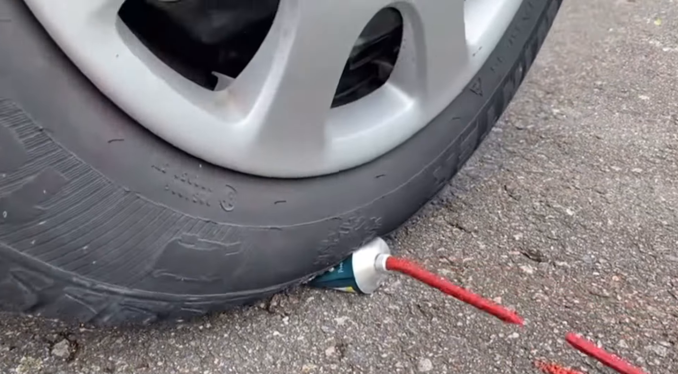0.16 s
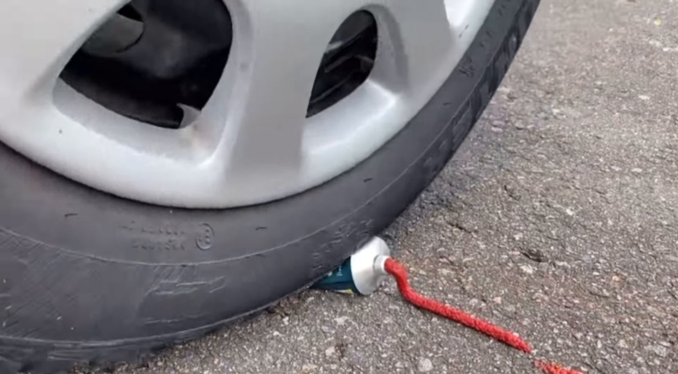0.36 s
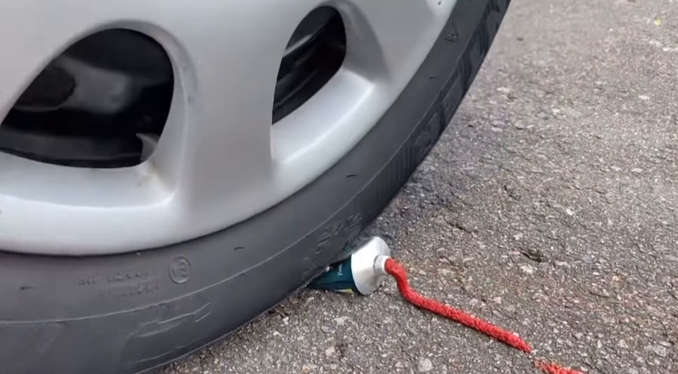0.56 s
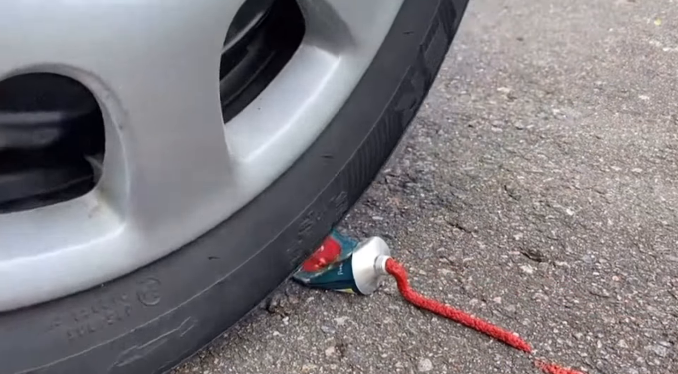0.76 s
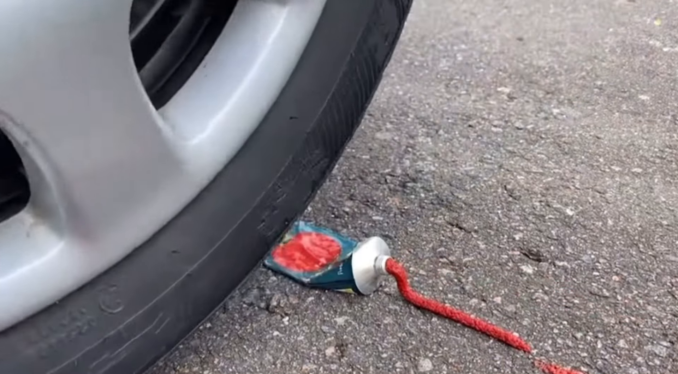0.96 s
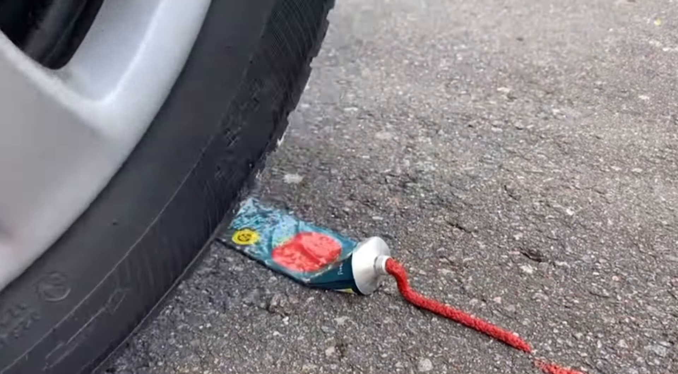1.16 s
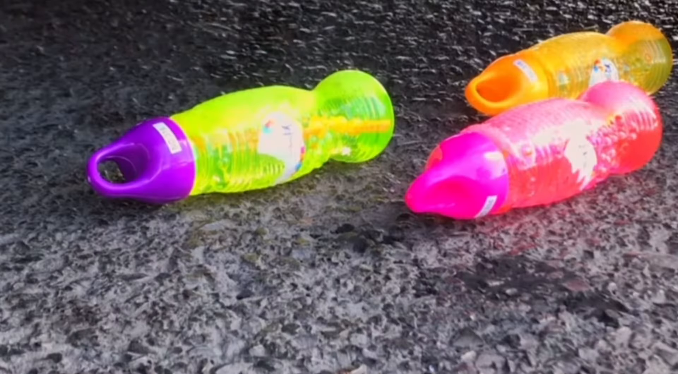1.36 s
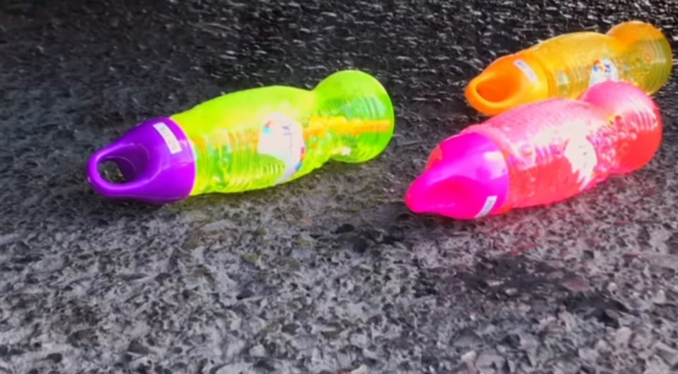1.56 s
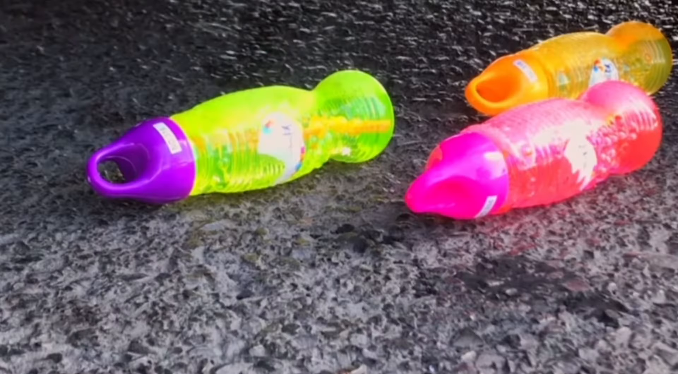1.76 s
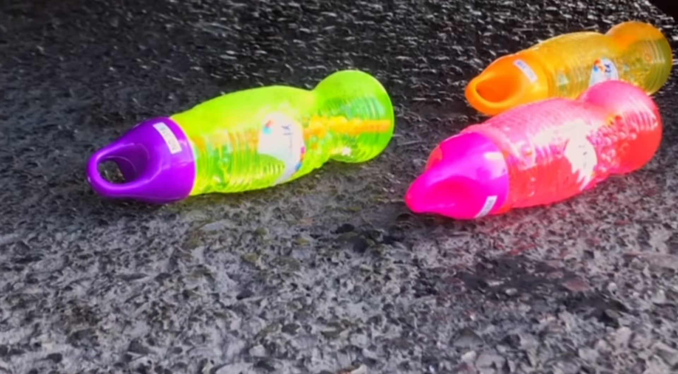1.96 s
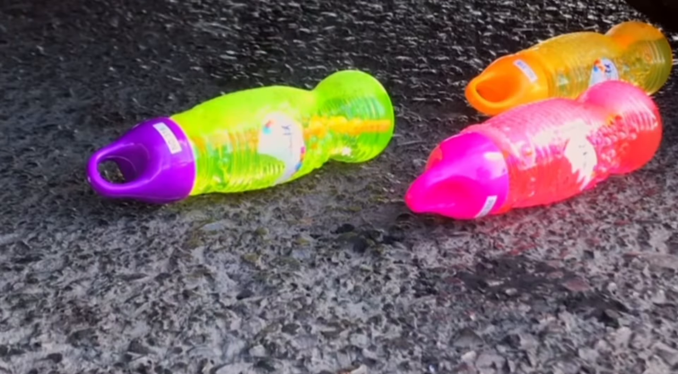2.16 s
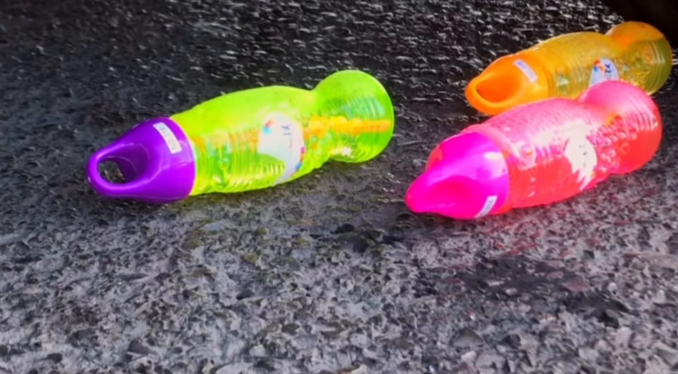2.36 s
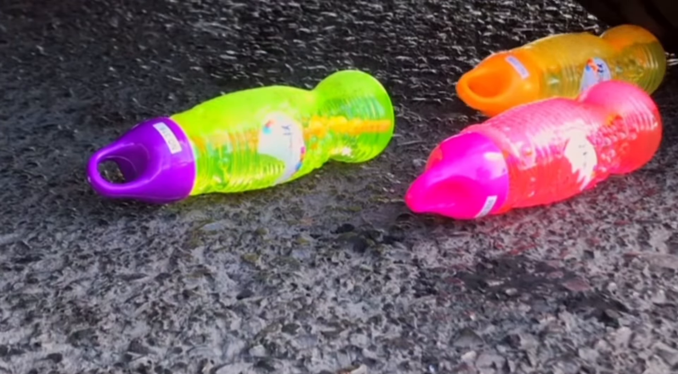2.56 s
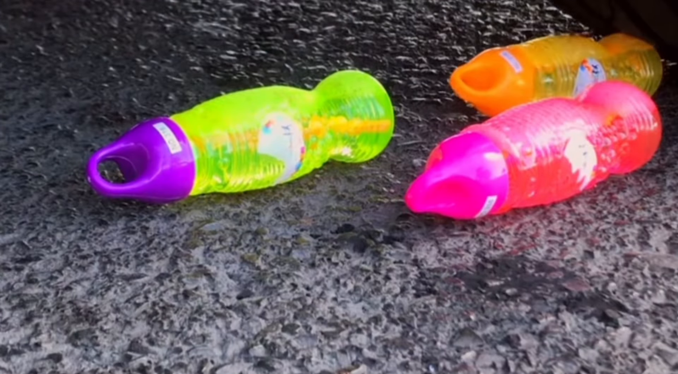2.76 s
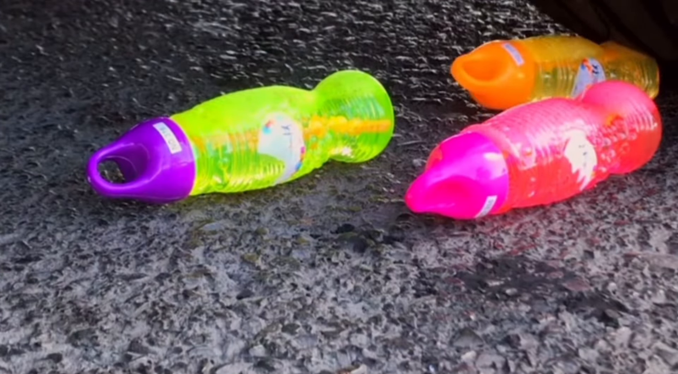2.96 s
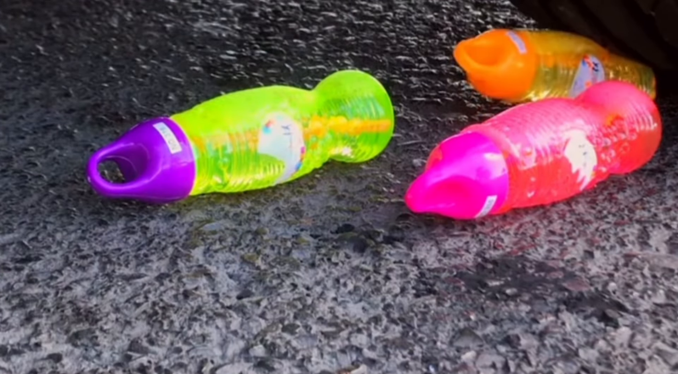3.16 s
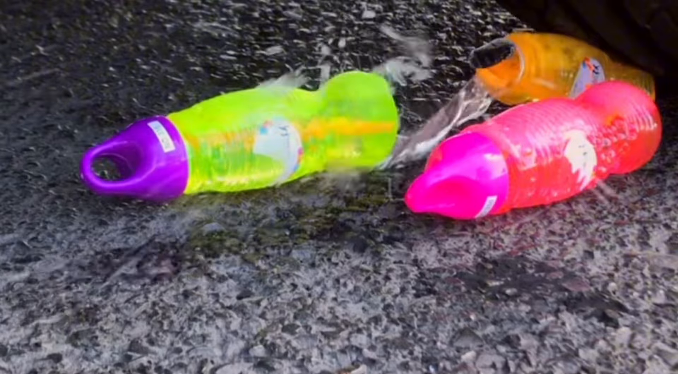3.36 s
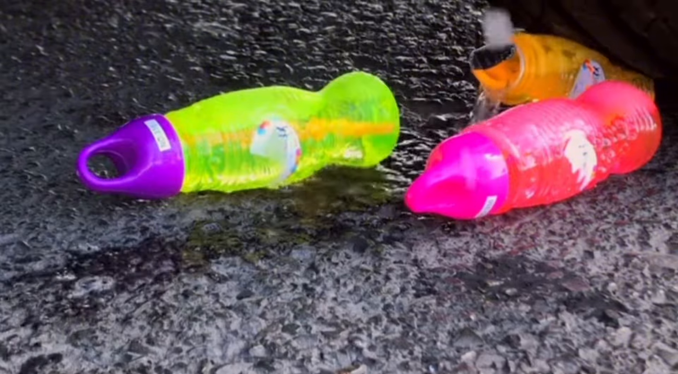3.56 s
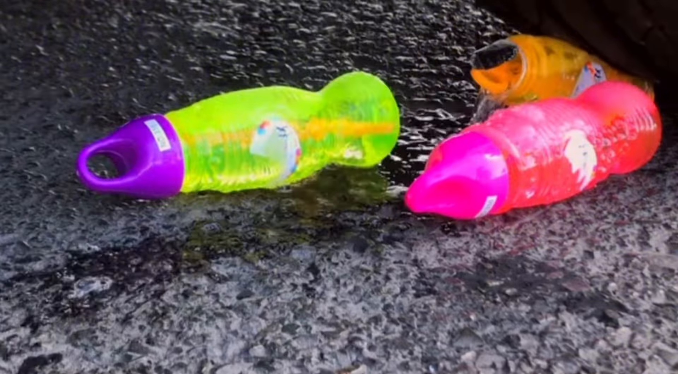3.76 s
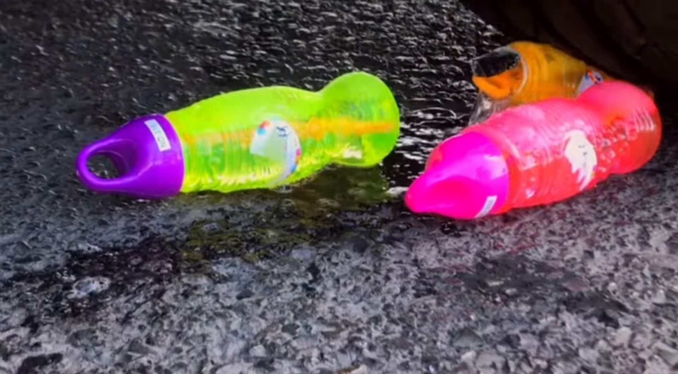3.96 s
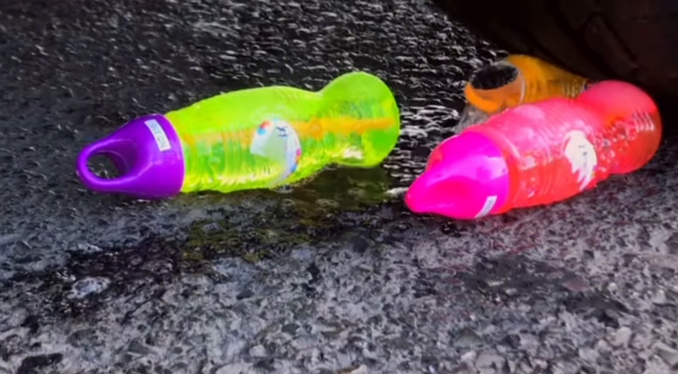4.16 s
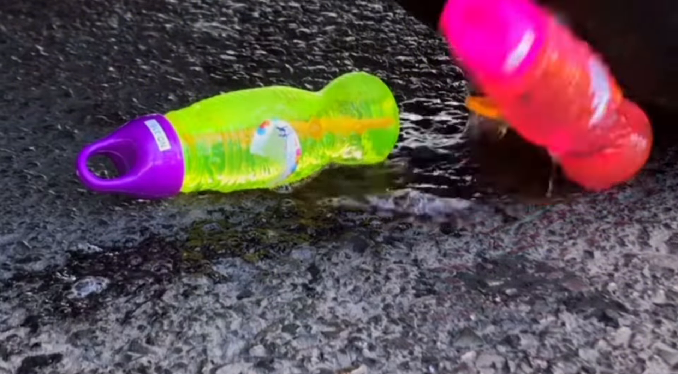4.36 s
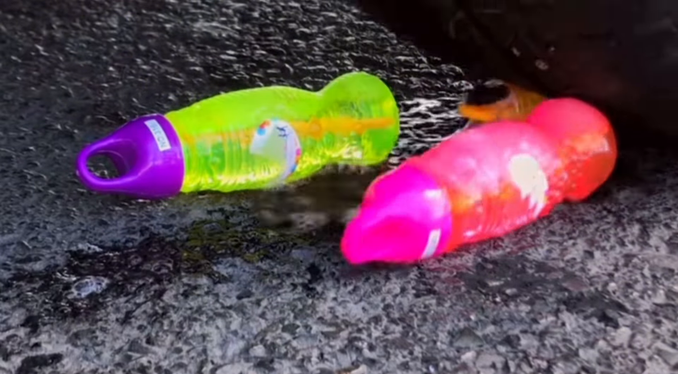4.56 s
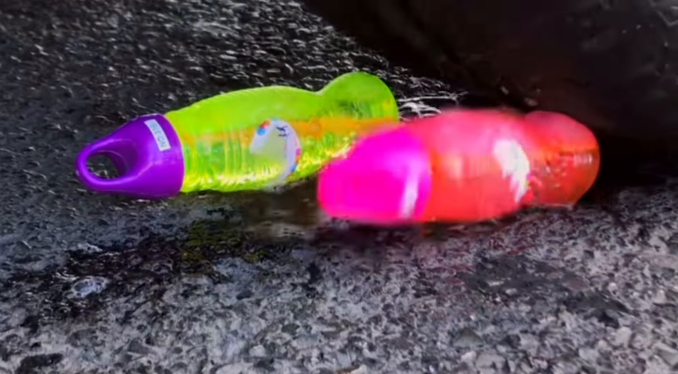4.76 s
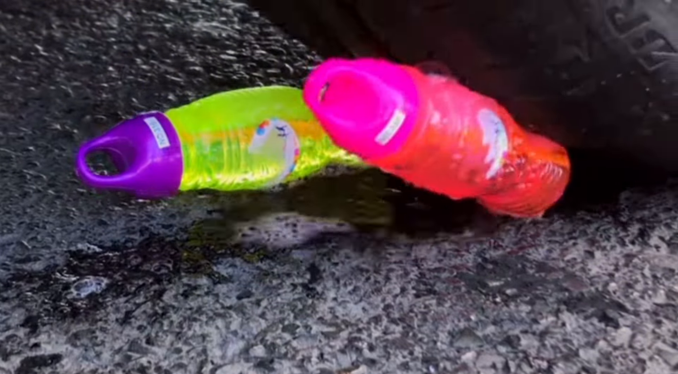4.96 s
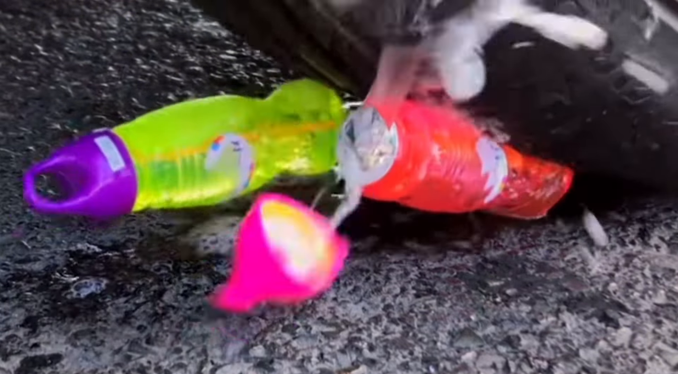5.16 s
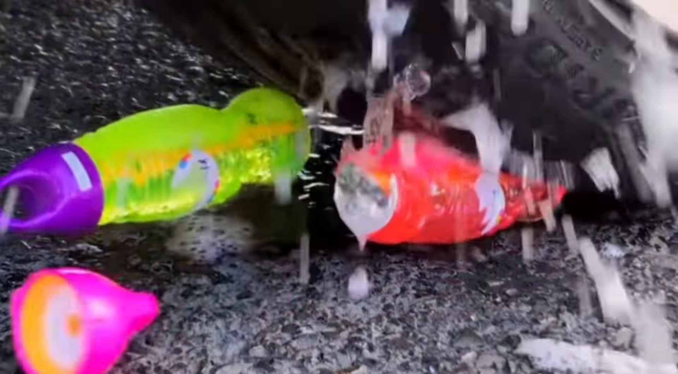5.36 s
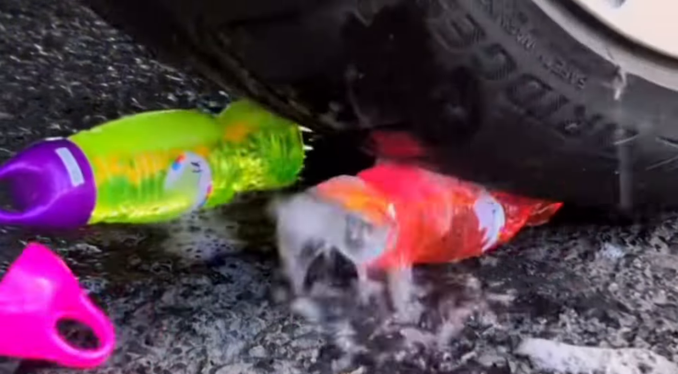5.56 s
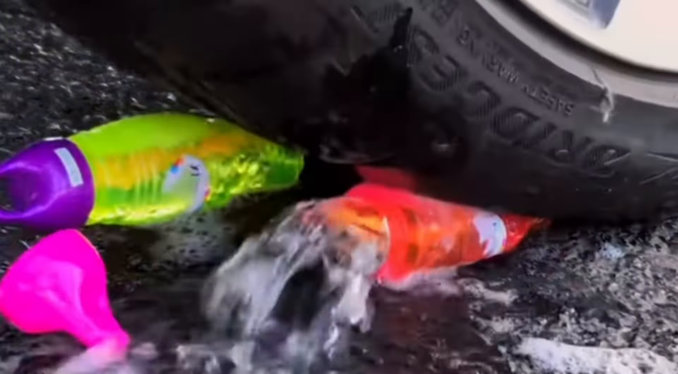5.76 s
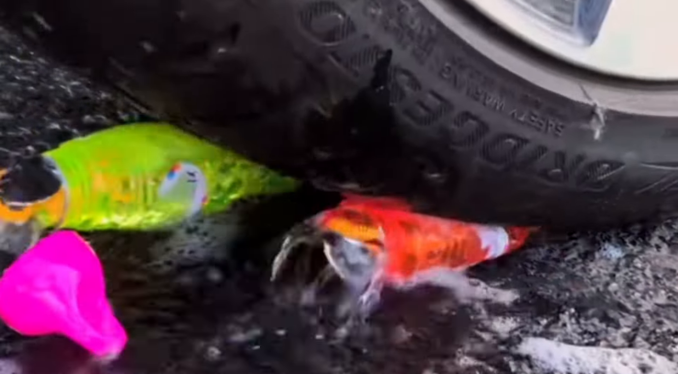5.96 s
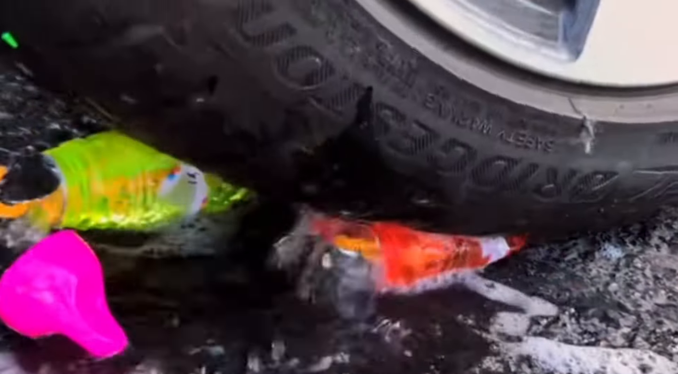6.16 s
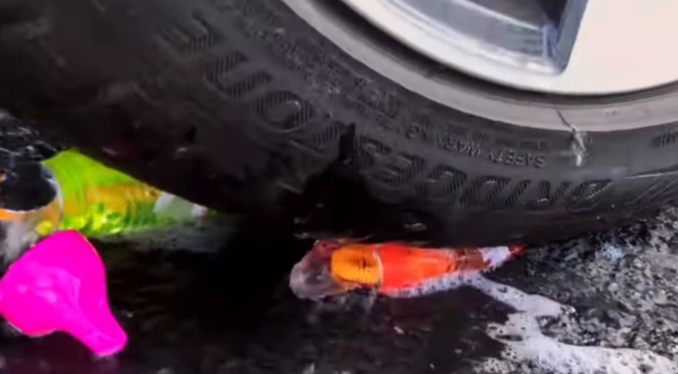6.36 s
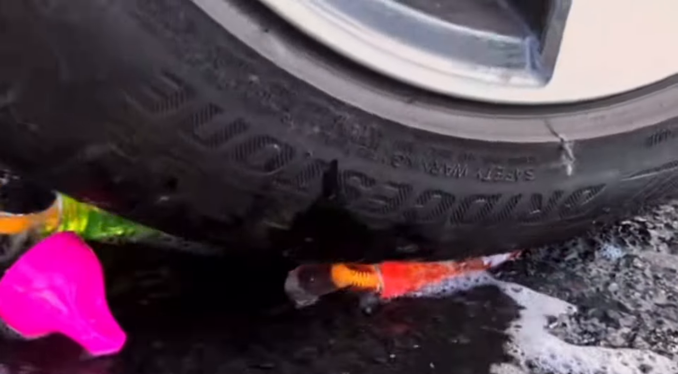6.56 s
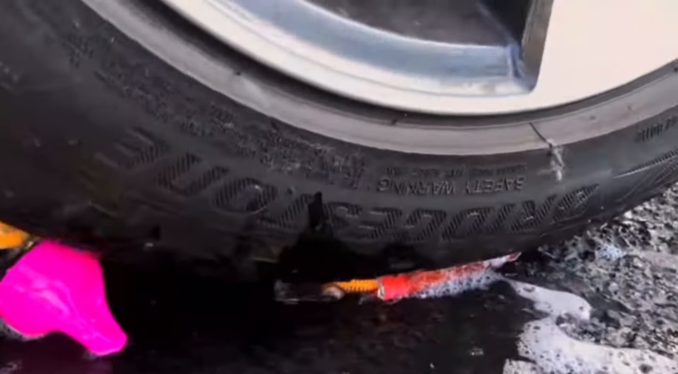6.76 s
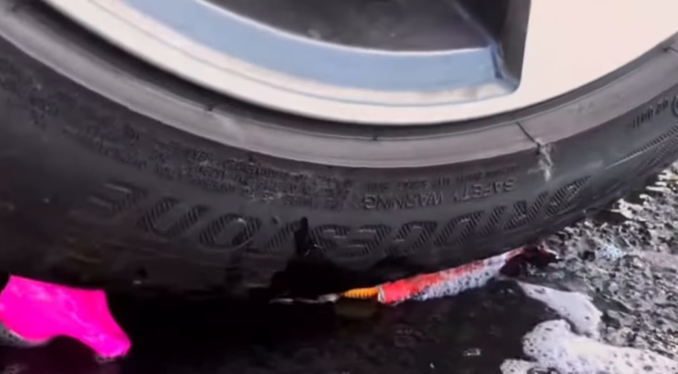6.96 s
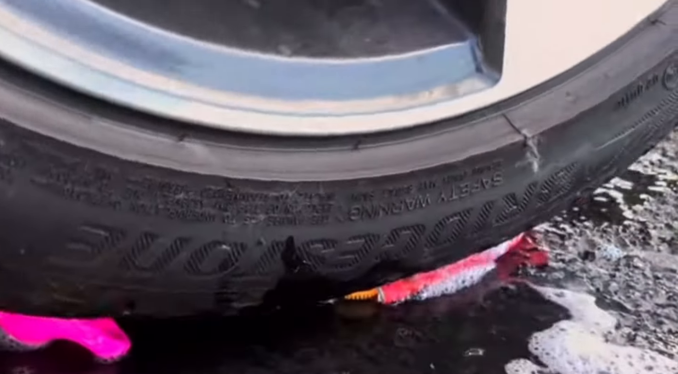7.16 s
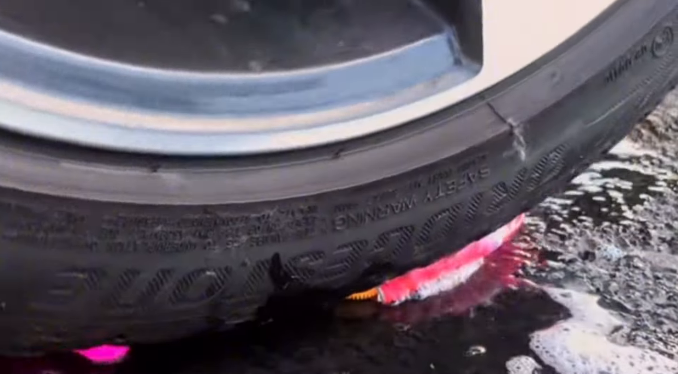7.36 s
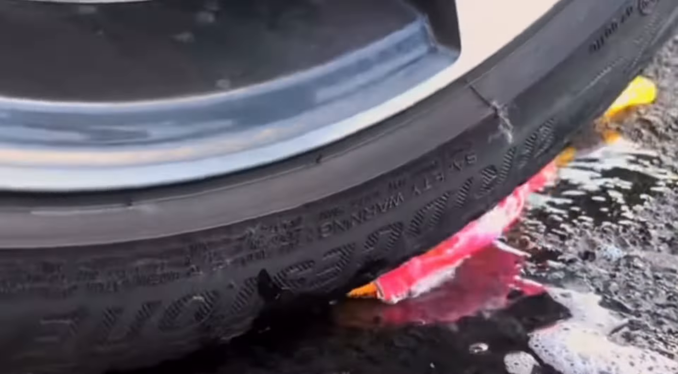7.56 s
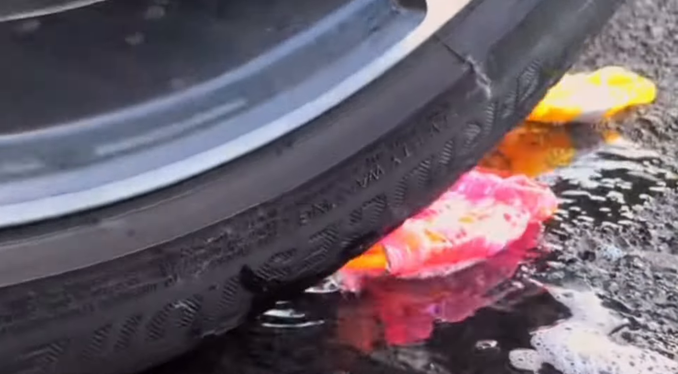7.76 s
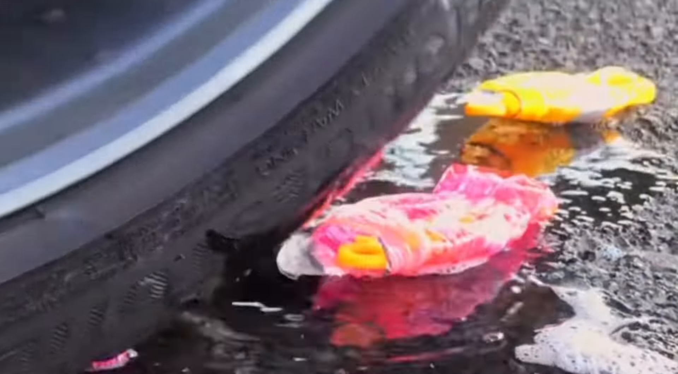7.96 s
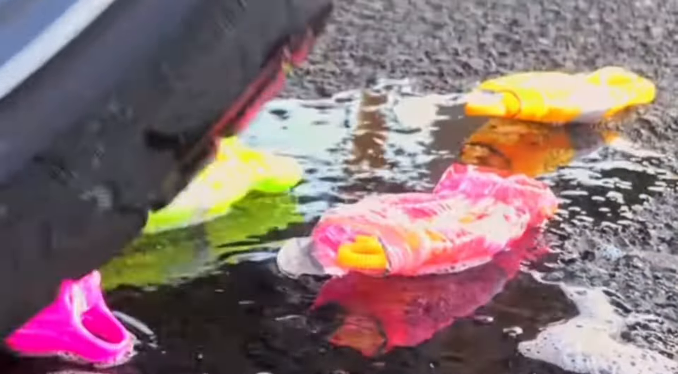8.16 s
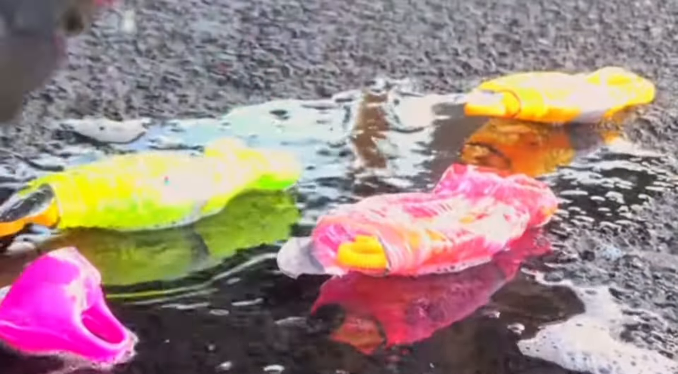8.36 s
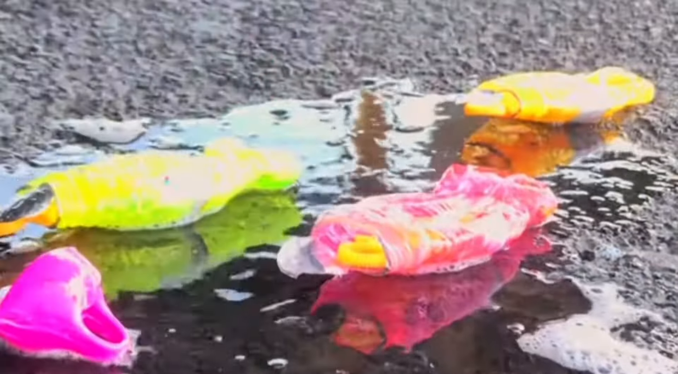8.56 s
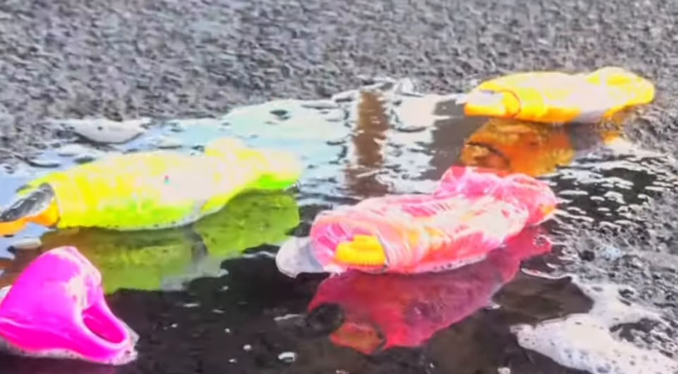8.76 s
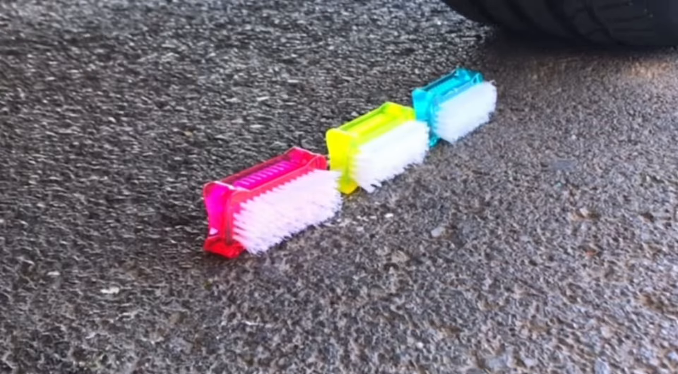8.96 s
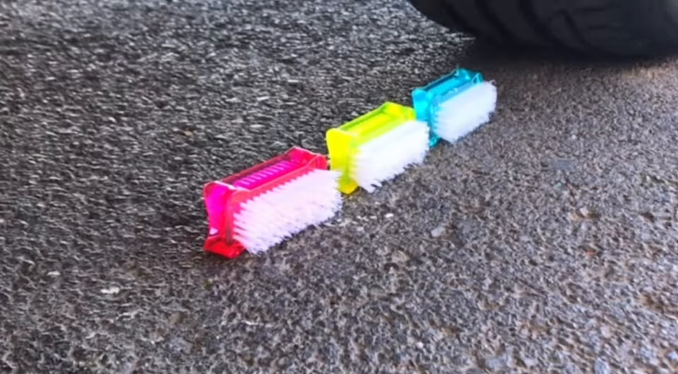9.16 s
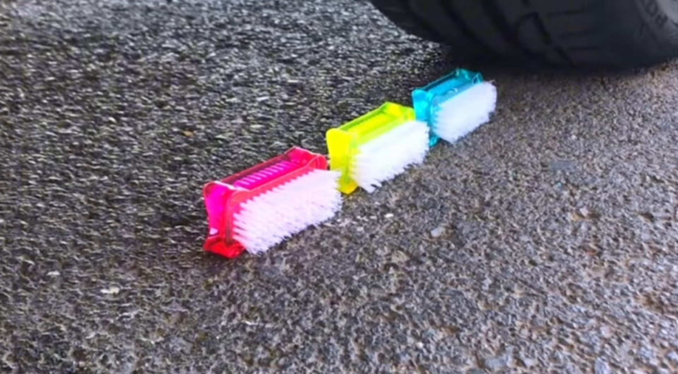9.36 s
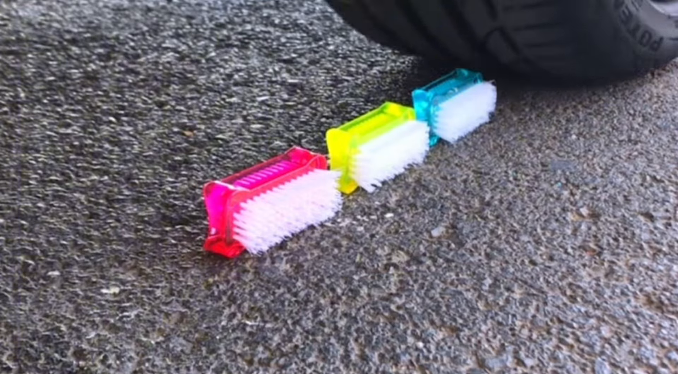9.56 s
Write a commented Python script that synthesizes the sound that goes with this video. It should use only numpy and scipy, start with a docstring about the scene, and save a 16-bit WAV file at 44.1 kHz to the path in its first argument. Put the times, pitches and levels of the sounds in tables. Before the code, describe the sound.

A car engine idles beside a faintly spurting tube, then a tyre slowly crushes soapy plastic bottles with sharp snaps, thuds, sprays and wind buffeting.

```python
"""An idling engine thrums across two microphone ports while a squeezed tube ticks and spurts close to it.
Then a car tyre creeps over bottles of soapy water on asphalt: they snap, thud and spray as wind buffets a mono
microphone, until wind and hiss fade out. Last come wind and road hiss, quiet at first and then brought up.
The engine is sines plus pulsing noise; wind and rubber are shaped noise; plastic is short noise bursts in
ringing resonators; jets are swelling band noise. A gain control and a soft limit finish the sound."""
import sys
import numpy as np
from scipy import signal
from scipy.fft import rfft, irfft, next_fast_len
from scipy.io import wavfile
from scipy.ndimage import uniform_filter1d

SR = 44100
rng = np.random.default_rng(int(sys.argv[2]) if len(sys.argv) > 2 else 0)


def wav_record(signal):
    """Record a signal, one row per channel, as 16-bit PCM in the file named by sys.argv[1]."""
    frames = np.transpose(np.atleast_2d(signal))
    bounded = np.clip(frames, -1, 1)
    # unit amplitude maps onto the largest positive 16-bit level
    quanta = np.round(bounded * 32767).astype(np.int16)
    wavfile.write(sys.argv[1], SR, quanta)


N = 423339
TIME = np.arange(N) / SR

# the engine stops and the bottles start; wind and hiss stop; the last passage starts
BOTTLES_S, FADE_END_S, LAST_PASSAGE_S = 1.3, 8.79, 8.815
# spectrum shape of low rumble, in engine and wind alike: hz, level_db (per Hz)
RUMBLE_SPECTRUM = [(20, -62), (38, -14.5), (65, 4.5), (92, 1), (140, -5), (230, -18), (370, -28.5),
                   (750, -68.5)]


def amp(db):
    """dB to gain."""
    return 10 ** (np.asarray(db) / 20)


def rms_one(x):
    """Scale to rms 1."""
    return x / np.sqrt(np.mean(x ** 2) + 1e-20)


def in_time(rows):
    """Columns of a curve table, sample by sample."""
    s, *columns = np.transpose(rows)
    return [np.interp(TIME, s, column) for column in columns]


def coloured(spectrum):
    """Noise with the given spectrum, rms 1."""
    hz, db = np.transpose(spectrum)
    size = next_fast_len(N, real=True)
    grid = np.arange(1, size // 2 + 2) * SR / size
    gain = amp(np.interp(np.log(grid), np.log(hz), db))
    return rms_one(irfft(rfft(rng.standard_normal(size)) * gain, size)[:N])


def band(x, low_hz, high_hz):
    """Second-order band-pass."""
    sos = signal.butter(2, [low_hz, min(high_hz, .45 * SR)], "band", fs=SR, output="sos")
    return signal.sosfilt(sos, x)


def drift(rate):
    """Slow chance from normal draws of spread 1, taken rate times a second and joined by straight lines."""
    steps = int(N / SR * rate) + 2
    return np.interp(TIME * rate, np.arange(steps), rng.standard_normal(steps))


def ring(x, hz, t60):
    """A unit click sets a decaying sine of starting height 1 ringing."""
    r, w = amp(-60 / (t60 * SR)), 2 * np.pi * hz / SR
    return signal.lfilter([0, np.sin(w)], [1, -2 * r * np.cos(w), r * r], x + 1e-18)


def add_at(out, s, sound):
    """Mix a short sound into out, starting s seconds in."""
    at = round(s * SR)
    out[at:at + len(sound)] += sound


def engine():
    """Idling engine: low orders as sines, noise puffed once a cycle; the lows reach the left port first."""
    # start_s, thrum_hz (firing rate before jitter), thrum_db, noise_db
    idle = [(0.0, 71.64, -29, -36.5), (1.3, 70.2, -21, -38.5)]
    # multiple of the cycle (the thrum is the third), level_db re thrum
    orders = [(1, -21), (2, -12), (3, 0), (5, -17), (6, -13.5), (9, -24.5)]
    # spectrum shape of the engine noise: hz, level_db (per Hz)
    noise_spectrum = [(100, -30), (165, -4), (300, -3), (600, -11), (950, -9), (1400, -16), (1700, -16),
                      (1950, -18.5), (2250, -15), (2900, -21), (3300, -26), (6300, -29), (8200, -45),
                      (11800, -47.5), (12600, -77)]
    jitter, throb = 0.01, 0.12   # relative speed spread, depth of the puffs
    rumble_db, across_db, port_lag_s = -35.5, 2.5, 0.0003

    thrum_hz, thrum_db, noise_db = in_time(idle)
    cycle = 2 * np.pi * np.cumsum(thrum_hz / 3 * (1 + jitter * drift(28))) / SR
    tones = 0
    for multiple, db in orders:
        tones = tones + amp(db + drift(10.7)) * np.sin(multiple * cycle + rng.uniform(0, 2 * np.pi))
    low = np.sqrt(2) * amp(thrum_db) * tones + amp(rumble_db) * coloured(RUMBLE_SPECTRUM)
    late_low = np.interp(TIME - port_lag_s, TIME, low)

    puff = amp(noise_db) * (1 + throb * np.cos(cycle))
    ahead = puff * coloured(noise_spectrum)
    # extra middle range and a full-range part stand in opposite phase at the two ports
    across = amp(across_db) * puff * rms_one(band(coloured(noise_spectrum), 590, 1350))
    scattered = amp(-1.5) * puff * coloured(noise_spectrum)
    left = amp(1.0) * low + ahead + across + scattered
    right = late_low + ahead - across - scattered
    return np.array([left, right]) * (TIME < BOTTLES_S)


def tube():
    """The squeezed tube creases in small uneven ticks, each ringing at one of five pitches."""
    from_s, to_s, creases_per_s, smallest_db = .19, .42, 260, -36
    sizes = amp(3.5 * np.minimum(rng.exponential(1, N), 3)) * rng.choice([-1, 1], N)
    born = (rng.random(N) < creases_per_s / SR) * (TIME > from_s) * (TIME < to_s)
    dealt = rng.integers(0, 5, N)
    pitches_hz = np.geomspace(1250, 2700, 5)
    ticks = sum(ring(sizes * born * (dealt == k), hz, 14.0 / hz) for k, hz in enumerate(pitches_hz))
    return amp(smallest_db) * ticks


def sprays():
    """Paste, water and air forced out: spluttering jets of band noise that swell and die."""
    # start_s, level_db (rms at full swell, before splutter), rise_s, t60_s, centre_hz,
    # width (frequency ratio each side, at least 1.05)
    jets = [(.3, -38.5, 0.15, 0.077, 1580, 1.47), (1.013, -31.5, 0.0011, 0.03, 1500, 2),
            (4.975, -18.5, 0.0032, 0.067, 2800, 1.1), (5.018, -17, 0.012, 0.26, 4850, 2.34),
            (5.027, -16.5, 0.0087, .09, 4620, 1.18), (5.2, -34.5, 0.11, 0.22, 2140, 3.4),
            (5.4, -38, 0.34, .2, 2680, 1.8), (6.249, -18, 0.0052, .07, 4000, 1.1),
            (7.085, -34, 0.054, 0.062, 2670, 1.9), (7.176, -11.5, 0.0069, 0.078, 3750, 1.12)]
    splutter_db = 3.0
    out, age = np.zeros(N + SR), np.arange(SR // 2) / SR
    for s, level_db, rise, t60, hz, width in jets:
        width = max(width, 1.05)
        shape = np.minimum(0.18 + age / rise, 1) * amp(-60 * np.maximum(age - rise, 0) / t60)
        steps = len(age) // 100
        splutter = np.interp(age * 300, np.arange(steps), rng.standard_normal(steps))
        jet = rms_one(band(rng.standard_normal(len(age)), hz / width, hz * width))
        add_at(out, s, amp(level_db + splutter_db * splutter) * shape * jet)
    return out[:N]


def fade(quiet_db, up_s):
    """Level in dB: the bottle passage fades out; the last passage starts quiet and comes up."""
    out_from_s, out_power, in_from_s = 8.01, 1.51, 9.25
    left = np.clip((LAST_PASSAGE_S - TIME) / (LAST_PASSAGE_S - out_from_s), 1e-3, 1)
    in_db = quiet_db * np.clip(1 - (TIME - in_from_s) / up_s, 0, 1)
    return np.where(TIME < LAST_PASSAGE_S, out_power * 20 * np.log10(left), in_db)


def wind():
    """Lumpy rumble of eddies on the microphone, its slow chance evened so that the gusts rule."""
    # start_s, level_db (before the fades and a 3 dB flutter)
    gusts = [(1.3, -23.5), (2.0, -22), (2.7, -21), (3.3, -25), (3.9, -26), (4.3, -19), (5.1, -29.5),
             (5.7, -24.5), (6.3, -27.5), (7.0, -21.5), (7.4, -27), (8.1, -21), (8.8, -34.5), (8.815, -31.5),
             (9.6, -25)]
    level_db, = in_time(gusts)
    rumble = coloured(RUMBLE_SPECTRUM)
    rumble = rumble / (0.049 + np.sqrt(uniform_filter1d(rumble ** 2, size=2500)))
    return amp(level_db + fade(quiet_db=-18, up_s=0.089) + 3.0 * drift(25)) * rms_one(rumble)


def patchy(x, patch_db, rate):
    """Narrow bands swell and sink, each in its own time."""
    edges = np.geomspace(300, 16000, 13)
    total, sign = 0, 1   # neighbouring bands have opposite signs
    for low_hz, high_hz in zip(edges, edges[1:]):
        total = total + sign * amp(patch_db * drift(rate)) * band(x, low_hz, high_hz)
        sign = -sign
    return rms_one(total)


def crush():
    """Rubber, grit and soapy water under the tyre: flickering hiss; more hiss brings more ringing crackles."""
    # start_s, hiss_db (before flicker and fades)
    pressure = [(1.3, -37.5), (1.75, -36.5), (2.5, -32.5), (2.8, -39), (3.7, -40.5), (4.4, -32.5),
                (5.1, -40), (5.7, -35.5), (6.0, -40.5), (7.05, -38.5), (7.3, -45), (7.9, -39.5),
                (8.15, -46.5), (8.8, -45), (8.815, -46), (9.6, -47)]
    # spectrum shape of the hiss: hz, level_db (per Hz)
    hiss_spectrum = [(200, -23), (300, 6.5), (600, -3), (1000, -3), (1700, -6), (3000, -8), (5500, -12),
                     (8000, -17), (11600, -22), (15500, -38.5), (16500, -61.5)]
    # start_s, lift_db (scaled below for the middle and the top)
    treble = [(1.3, 0.5), (6.5, 0.5), (7.5, -4.5), (8.8, -8), (8.815, 4), (9.6, 6)]
    on_from_s, on_until_s, roll_off_s = 2.4, 8.0, .4   # tyre on the bottles
    crackles_per_s, crackle_from_db = 150, -37.5   # crackle rate when the hiss is at this level
    grit_per_s, grit_db = 1500, -10.5   # grit level re hiss_db, before unrest scales it

    (hiss_db,), (treble_db,) = in_time(pressure), in_time(treble)
    on_bottles = (TIME > on_from_s) * np.clip((on_until_s - TIME) / roll_off_s, 0, 1)
    unrest = 0.15 + on_bottles   # plain rolling is steadier than crushing

    noise = patchy(coloured(hiss_spectrum), patch_db=2.5, rate=25)
    low = signal.lfilter(*signal.butter(1, 1500, fs=SR), noise)
    top = signal.lfilter(*signal.butter(1, 5500, "high", fs=SR), noise - low)
    middle = noise - low - top
    hiss = 0
    for lift_db, part in [(0, low), (0.26 * treble_db, middle), (1.4 * treble_db, top)]:
        hiss = hiss + amp(lift_db + 3.3 * unrest * drift(45)) * part
    hiss = amp(0.61 * unrest * drift(10)) * hiss

    # small crackles and bubbles, each ringing at one of fourteen pitches
    sizes = amp(5.3 * np.minimum(rng.exponential(1, N), 3.2)) * rng.choice([-1, 1], N)
    born = rng.random(N) < crackles_per_s * amp(1.5 * (hiss_db - crackle_from_db)) / SR
    clicks = sizes * born * np.sqrt(on_bottles)
    dealt = rng.integers(0, 14, N)
    crackle_hz = np.geomspace(800, 9000, 14)
    crackle = sum(ring(clicks * (dealt == k), hz, 6.8 / hz) for k, hz in enumerate(crackle_hz))

    # wet grit shifts under the tread in dense, uneven grains
    grains = sizes * (rng.random(N) < grit_per_s * amp(4.0 * unrest * drift(20)) / SR)
    grit_hz = np.geomspace(1500, 7000, 7)
    grit = rms_one(sum(ring(grains * (dealt // 2 == k), hz, 4.7 / hz) for k, hz in enumerate(grit_hz)))

    mix = amp(-1.0) * hiss + amp(1.0) * crackle + amp(grit_db) * unrest * grit
    return amp(hiss_db + fade(quiet_db=-12, up_s=0.13)) * mix


def thump(age):
    """A short push of air that drops in pitch."""
    turn = 2 * np.pi * np.cumsum(130 + 220 * np.exp(-age / 0.0064)) / SR
    return np.sin(turn) * amp(-60 * age / 0.077)


def thuds():
    """Hollow pushes of air as a bottle gives way or a gust hits."""
    # start_s, level_db (starting height of the dying sine)
    pushes = [(1.305, -18), (1.309, -10), (1.347, -16.5), (1.736, -20.5), (2.01, -16.5), (2.742, -12.5),
              (2.907, -17), (3.202, -0.5), (3.894, -12), (3.993, -17.5), (4.381, -21), (4.396, -11.5),
              (4.417, -15), (4.712, -22), (4.737, -15), (5.056, -15.5), (5.626, -15.5), (5.804, 1.5),
              (5.91, -12), (6.273, -17), (7.174, -14), (7.246, -17), (7.372, -15), (7.616, -21.5),
              (7.92, -13.5), (7.953, -15), (9.389, -29.5)]
    age, out = np.arange(int(.1 * SR)) / SR, np.zeros(N + SR)
    for s, level_db in pushes:
        add_at(out, s, amp(level_db) * thump(age))
    return out[:N]


def buffets():
    """Each sudden eddy pushes the membrane for a few cycles, swelling fast and dying."""
    # start_s, strength_db (lowered by 6.5 dB below), pitch_hz
    eddies = [(1.342, -10, 102), (1.457, -7, 96.6), (1.513, -0.5, 83.3), (1.748, -4, 102.5),
              (1.81, -6.5, 96), (1.937, -7.5, 88.4), (1.997, -1, 98.5), (2.197, -6, 81), (2.357, -14, 94.3),
              (2.552, -3, 76.2), (2.706, -4, 73), (2.741, -1.5, 102), (2.907, -11, 126),
              (3.191, -11, 119.5), (3.533, -0.5, 89.6), (3.929, -5.5, 70), (4.653, -14, 87),
              (5.713, -11, 86), (5.796, 0.5, 101.4), (6.002, -9.5, 74.6), (6.673, -9, 105.3),
              (6.877, -9, 93.6), (7.05, -7, 84), (7.234, -17, 123), (7.624, -7, 94), (7.765, -13, 87),
              (8.08, -3.5, 90.5), (8.819, -29, 78)]
    age, out = np.arange(int(.2 * SR)) / SR, np.zeros(N + SR)
    shape = (age / 0.014) * np.exp(1 - age / 0.014)
    for s, strength_db, hz in eddies:
        turn = 2 * np.pi * hz * age + rng.uniform(0, 2 * np.pi)
        # the push is lopsided at its height, which adds overtones
        push = np.sin(turn) + .25 * shape * np.sin(2 * turn) + 0.05 * shape * np.sin(3 * turn)
        add_at(out, s, amp(strength_db - 6.5) * shape * push)
    return out[:N]


def snaps():
    """Each plastic snap: a crack, a dying rattle, the wall modes, a treble splinter and a thump of air."""
    # start_s, peak_db (of the body), pitch_hz (main ring), t60_s (at least 0.01), treble_db (re body peak)
    breaks = [(2.461, -18, 1430, 0.049, -27), (2.506, -10, 1500, 0.087, -19),
              (2.536, -11.5, 1500, 0.057, -46), (2.601, -11, 1600, 0.03, -15),
              (2.787, 5, 1450, 0.061, -5.5), (3.054, -4, 1570, 0.071, -14), (3.199, 0.5, 1240, 0.098, -3),
              (3.572, 0.5, 3400, 0.085, -6.5), (3.822, -11, 1580, 0.099, -10.5),
              (3.894, -12, 1250, 0.11, -9), (3.993, -11.5, 990, 0.063, -26),
              (4.115, -17.5, 5840, 0.056, -13), (4.306, -14, 4630, 0.15, -5.5),
              (4.381, -4, 1630, 0.089, -8), (4.384, -5.5, 1990, 0.043, -12.5),
              (4.394, -7.5, 2300, 0.086, 0), (4.408, -6.5, 2280, 0.055, -11), (4.456, -5, 1950, 0.043, -5),
              (4.462, -9.5, 1740, 0.027, -15), (4.484, -17.5, 3100, .03, -18), (4.521, -20, 2000, .03, -20),
              (4.56, -19.5, 1600, 0.08, -16), (4.636, -20.5, 1500, 0.087, -5),
              (4.712, -1, 4740, 0.091, -11.5), (4.727, -10.5, 3680, 0.076, -12.5),
              (4.734, -9, 1470, 0.03, 6.5), (4.787, -13, 1070, 0.043, 0), (4.799, -16.5, 2500, .02, -21),
              (4.817, -15.5, 1270, 0.037, 2.5), (4.841, -11.5, 1640, 0.01, -8),
              (4.862, -16, 6360, 0.012, -32), (4.907, -15, 5750, 0.021, 9), (4.959, -23.5, 6000, .03, 3),
              (4.973, 4, 1870, 0.025, -15), (5.018, -7.5, 2000, 0.044, 8), (5.059, -12, 4200, 0.037, -8),
              (5.067, -9, 4220, 0.084, -16), (5.094, -8.5, 1530, 0.026, -20),
              (5.093, -1.5, 4200, 0.056, -25), (5.128, -7, 1590, 0.014, -13), (5.176, -18, 2490, 0.06, -5),
              (5.223, -19, 1570, 0.08, -15), (5.338, -15.5, 2160, 0.057, -16),
              (5.391, -20, 2200, 0.018, -25), (5.399, -17.5, 2250, 0.017, -5), (5.413, -21, 2400, .03, -20),
              (5.435, -14, 1430, 0.13, -11.5), (5.473, -18.5, 1580, 0.043, -6),
              (5.498, -19, 2460, 0.04, -15), (5.504, -18, 2500, .05, 2), (5.526, -23, 2600, .04, -15),
              (5.604, -13, 2650, 0.0099, -23), (5.627, -14.5, 850, 0.023, -58),
              (5.647, -21, 2800, .03, -18), (5.675, -16, 3200, 0.049, -4), (5.802, 2.5, 1220, 0.071, -2),
              (5.841, -15, 1560, 0.063, 3), (5.871, -11, 2400, 0.041, -3), (5.909, 0, 1810, 0.011, -11),
              (5.915, -2.5, 1420, 0.027, -11), (6.024, -17, 1000, 0.032, -12),
              (6.043, -18.5, 710, 0.013, -36), (6.074, -14, 820, 0.021, -61),
              (6.187, -7.5, 2610, 0.12, -73.5), (6.225, -16.5, 1010, 0.057, -32),
              (6.247, 0, 2270, 0.095, -8.5), (6.276, -5.5, 1040, 0.034, -19),
              (6.343, -19.5, 1610, 0.048, 4), (6.423, -16, 1280, 0.04, -35), (6.52, -19, 2500, 0.044, -13),
              (6.535, -4.5, 1085, 0.063, -43), (6.583, -5.5, 4230, 0.025, -7.5),
              (6.603, -22, 1790, 0.024, -25), (6.983, -19.5, 1550, 0.084, -5.5),
              (7.176, 3.5, 3960, 0.081, -12.5), (7.336, -23.5, 1490, 0.05, -3),
              (7.373, -5.5, 1050, 0.074, 2), (7.452, -20, 1320, 0.047, -35), (7.698, -18, 1040, 0.023, -72),
              (7.861, -19, 960, 0.058, -43), (7.898, -28, 1100, .06, -22.5), (7.919, -5, 853, 0.046, -64),
              (7.995, -17, 840, 0.063, -36), (8.014, -26, 900, 0.16, -47), (8.078, -32.5, 1780, .03, -37),
              (8.13, -33.5, 1770, 0.027, -39)]
    # bottle wall modes: pitch_hz, level_db (before chance and distance from the main ring), t60_s
    wall_modes = [(950, 0, .025), (1370, -2, .02), (1650, -3, .02), (2300, -4, .02), (2670, -2, .02),
                  (3240, 0, .02), (3850, -3, .015), (4370, -4, .015), (5900, -8, .015)]
    thump_db = -22.5   # re body peak
    out, span = np.zeros(N + SR), int(.14 * SR)
    age = np.arange(span) / SR
    for s, peak_db, hz, t60, treble_db in breaks:
        t60 = max(t60, .01)
        noise = rng.standard_normal((3, span))
        # the wall tears in a few quick jerks, so the rattle is ragged
        jerks = np.repeat(noise[2, :span // 60 + 1], 60)[:span]
        ragged = amp(-60 * age / t60 + 2.57 * jerks)
        crack = noise[0] * amp(-60 * age / 0.0079) * np.minimum(age / 0.00078, 1)
        crack[20] += 1.1 * np.sign(crack[20])   # the first break is one sharp click
        push = crack + 0.23 * noise[0] * ragged
        rattle = crack + 0.4 * noise[1] * ragged

        # modes far from the main ring are driven less
        wall = 0
        for (mode_hz, db, mode_t60), chance_db in zip(wall_modes, rng.normal(0, 3.9, len(wall_modes))):
            mode_db = db + chance_db - 24.0 * abs(np.log2(mode_hz / hz))
            wall = wall + amp(mode_db) * ring(push, mode_hz, mode_t60)
        # a brittle snap with much treble is also broad in the middle, where most of its rattle lies
        width = 1.19 + 0.52 * amp(0.45 * min(treble_db, 0))
        # the first break also sets the snap's own pitch ringing for some cycles
        pop = band(ring(push * (age < 0.0008) + 0.16 * push, hz, 12.0 / hz), hz / 1.48, hz * 1.6)

        body = 0.74 * rms_one(band(push, hz / width, hz * width)) + 0.47 * rms_one(pop)
        body += amp(0.25 * treble_db) * rms_one(band(rattle, 830, 3900)) + 0.24 * rms_one(wall)
        splinter_shape = (amp(-60 * age / 0.006) + 0.23 * ragged) * np.minimum(age / 0.0017, 1)
        splinter = band(noise[1] * splinter_shape, 2800, 8530)
        for part, db in [(body, 0), (splinter, treble_db), (thump(age), thump_db)]:
            add_at(out, s, amp(peak_db + db) * part / np.max(np.abs(part)))
    return out[:N]


def gurgle():
    """Water leaves the burst bottle: breathy hollow resonances slide up together as it empties."""
    # multiple of the sliding pitch, level_db
    overtones = [(1.001, 4), (1.498, 12), (1.801, 10)]
    start_s, length_s, from_hz, to_hz, level_db = 5.21, .14, 720, 1500, -47
    part = np.clip((TIME - start_s) / length_s, 0, 1)
    turn = 2 * np.pi * np.cumsum(from_hz * (to_hz / from_hz) ** part) / SR
    tones = sum(amp(db) * drift(150) * np.sin(multiple * turn) for multiple, db in overtones)
    return amp(level_db) * np.sin(np.pi * part) * tones


def housing(x):
    """The microphone housing cuts and lifts a few narrow bands."""
    # centre_hz, width_hz, gain_db
    resonances = [(510, 45, -7.5), (603, 27, 6.5), (1640, 70, 2), (2015, 300, -4.5), (3030, 160, 2.5),
                  (5006, 310, -9.5), (5090, 340, 4.5), (5600, 190, 2.5), (10800, 380, -7), (11360, 590, 3)]
    for hz, width_hz, db in resonances:
        b, a = signal.iirpeak(hz, hz / width_hz, fs=SR)
        x = x + (amp(db) - 1) * signal.lfilter(b, a, x)
    return x


def scene():
    """Stereo engine, then mono bottles; wind and hiss break off for a moment before the last passage."""
    sounding = (TIME >= BOTTLES_S) * ((TIME < FADE_END_S) | (TIME >= LAST_PASSAGE_S))
    air = sounding * (wind() + buffets())
    objects = tube() + sprays() + sounding * crush() + thuds() + snaps() + gurgle()
    return engine() + air + housing(objects)


def duck(level_db, knee_db, share, release_db_s):
    """Gain loss in dB: a share of the level over the knee; the held excess is let go at a steady rate."""
    over = np.maximum(level_db - knee_db, 0)
    held = np.maximum.accumulate(over + release_db_s * TIME) - release_db_s * TIME
    return share * signal.lfilter([.003], [1, -.997], held)


def record(dry):
    """Gain control ducks after loud sounds, part returns fast and part creeps; peaks are rounded, the top cut."""
    level_db = 10 * np.log10(uniform_filter1d(np.mean(dry ** 2, axis=0), size=400) + 1e-12)
    fast_db = duck(level_db, knee_db=-18.5, share=0.085, release_db_s=42.5)
    slow_db = duck(level_db, knee_db=-20, share=0.34, release_db_s=17.5)
    wet = np.tanh(dry * amp(-fast_db - slow_db) / 1.077) * 1.168
    return signal.sosfilt(signal.cheby2(14, 80, 16800, fs=SR, output="sos"), wet)


dry = scene()
out = record(dry)
wav_record(out)
```